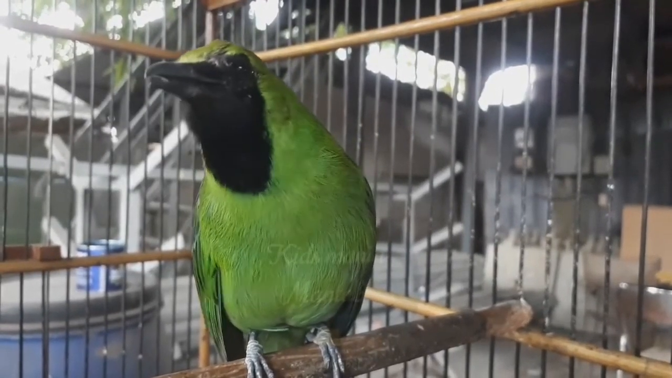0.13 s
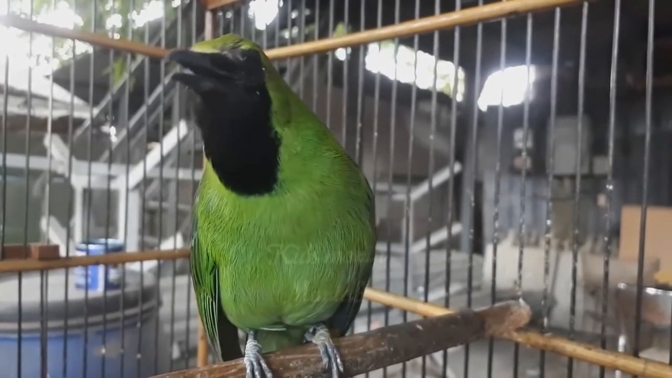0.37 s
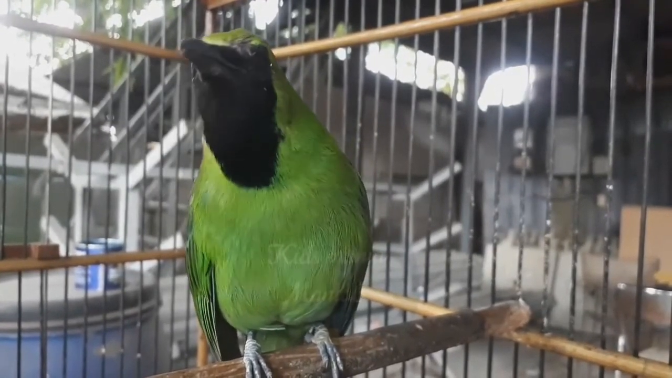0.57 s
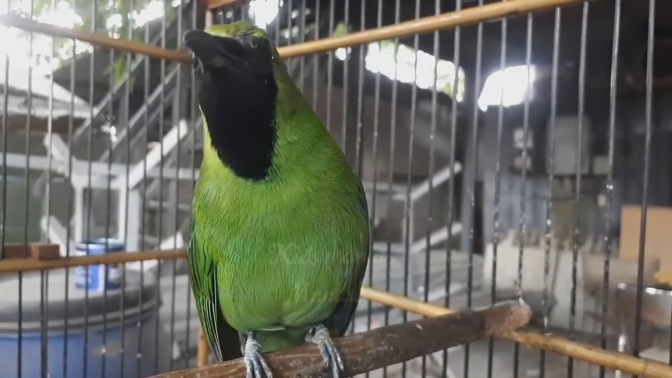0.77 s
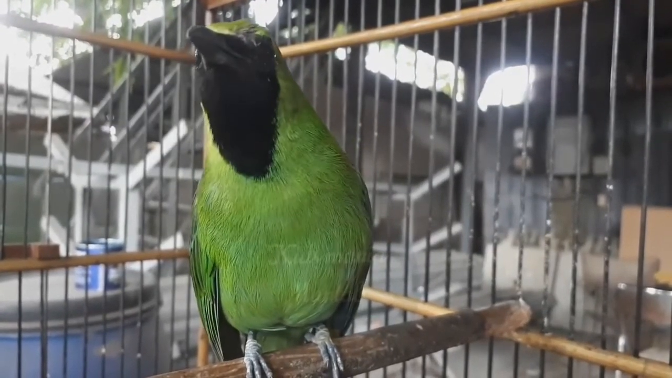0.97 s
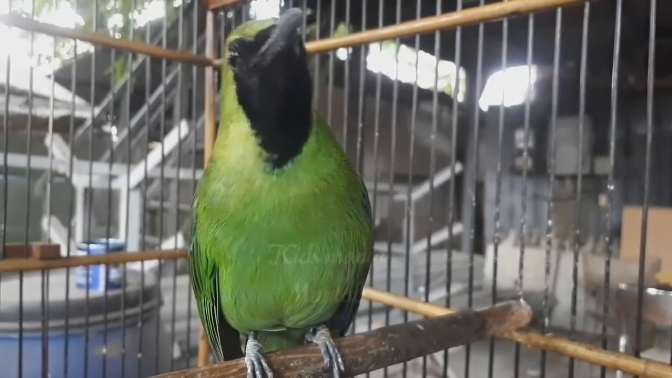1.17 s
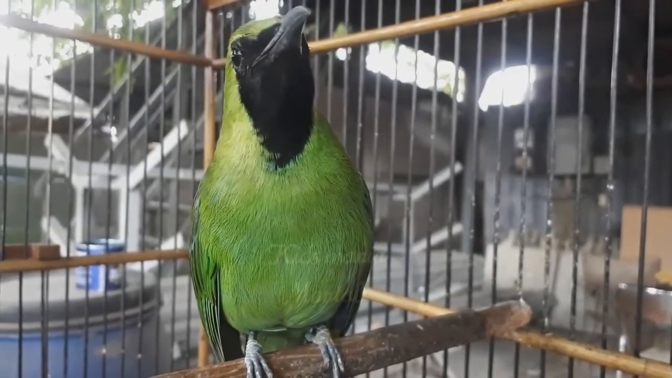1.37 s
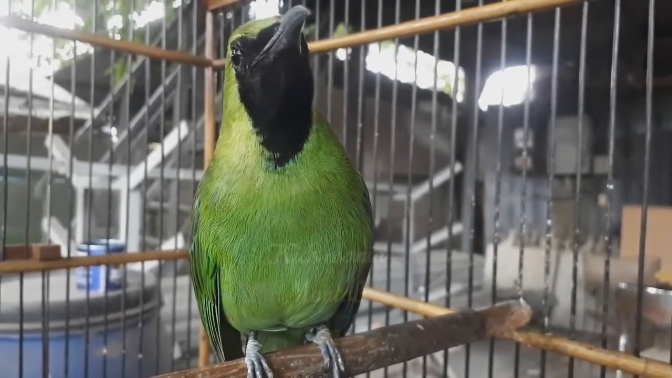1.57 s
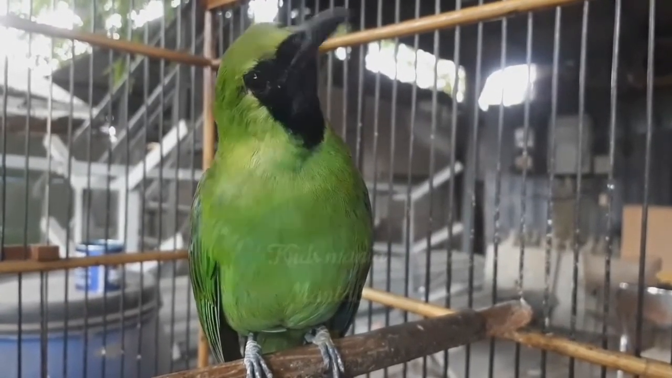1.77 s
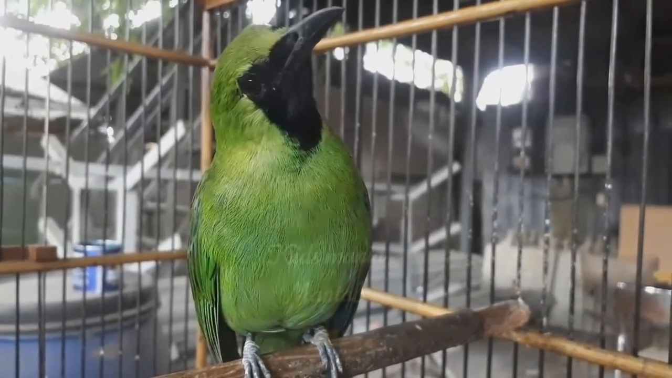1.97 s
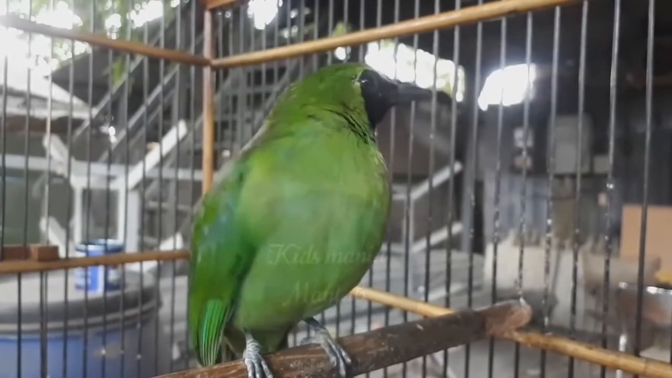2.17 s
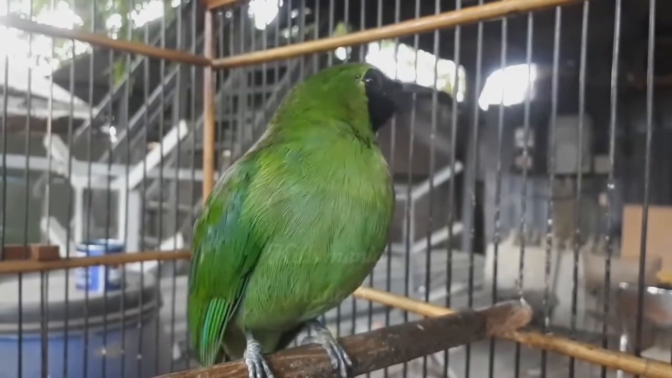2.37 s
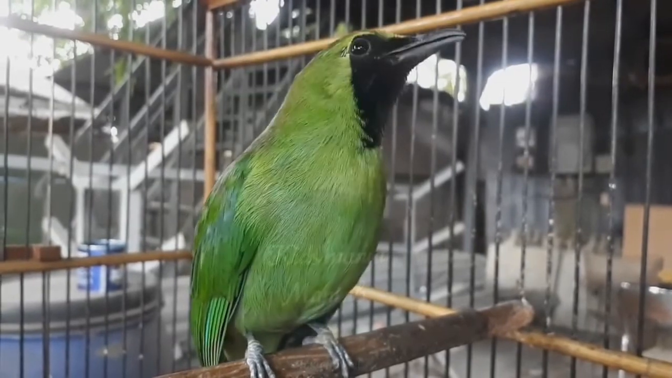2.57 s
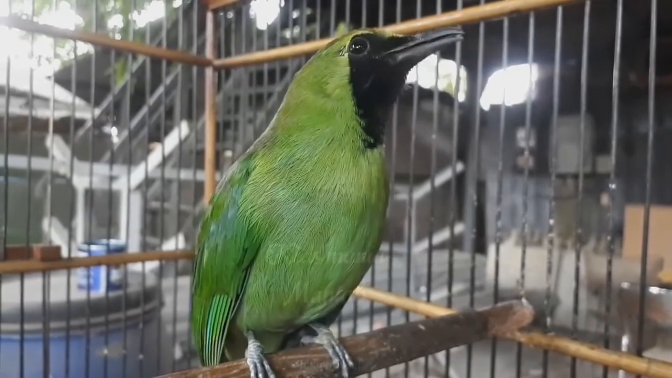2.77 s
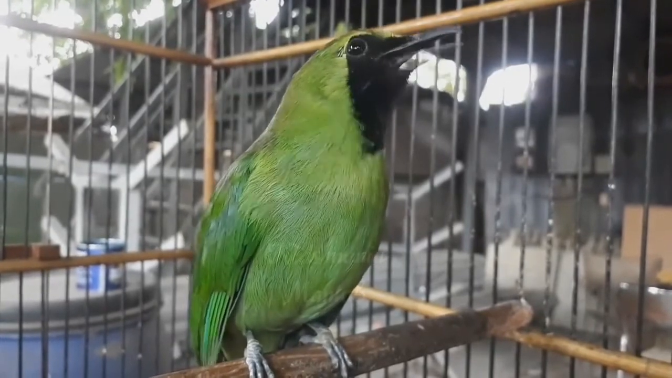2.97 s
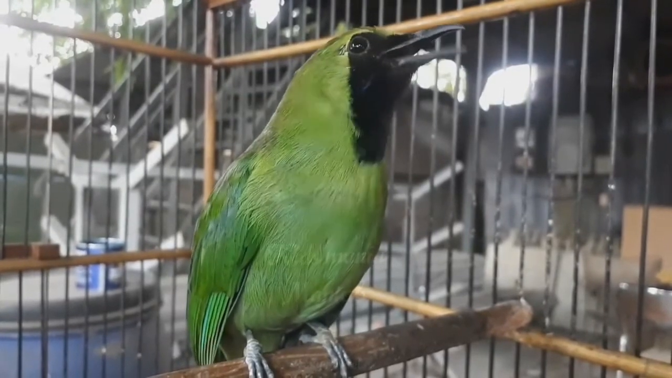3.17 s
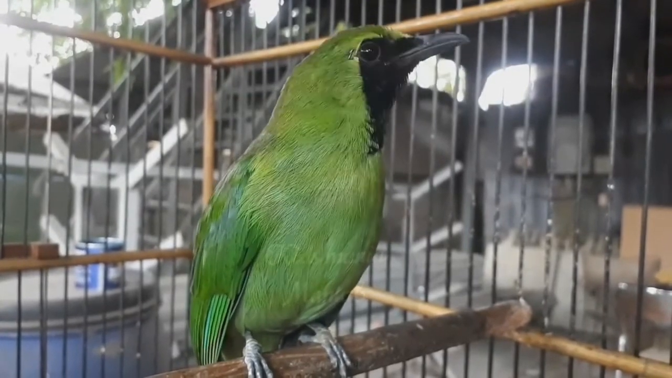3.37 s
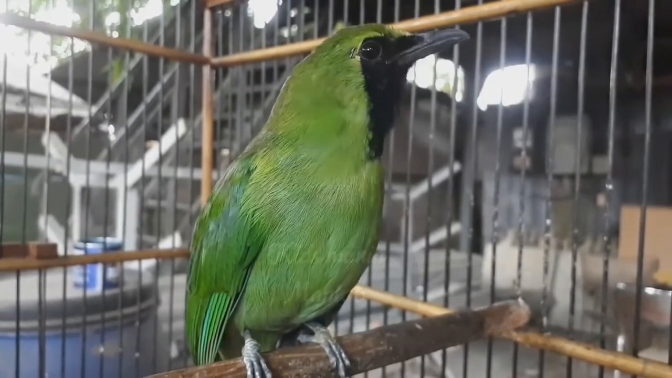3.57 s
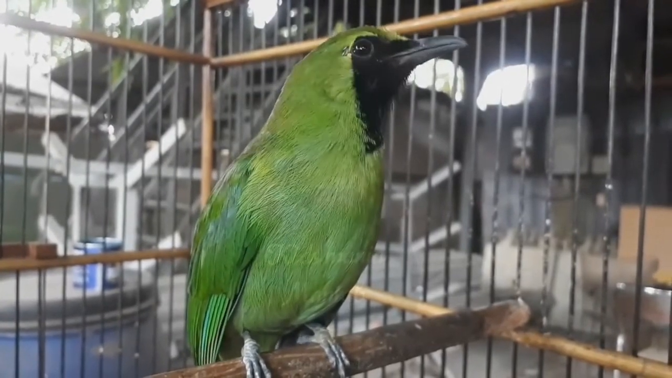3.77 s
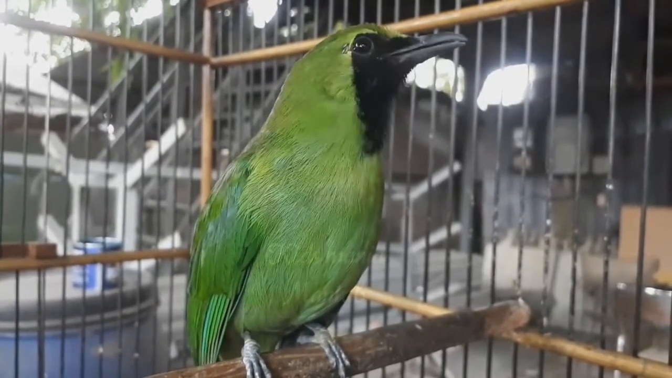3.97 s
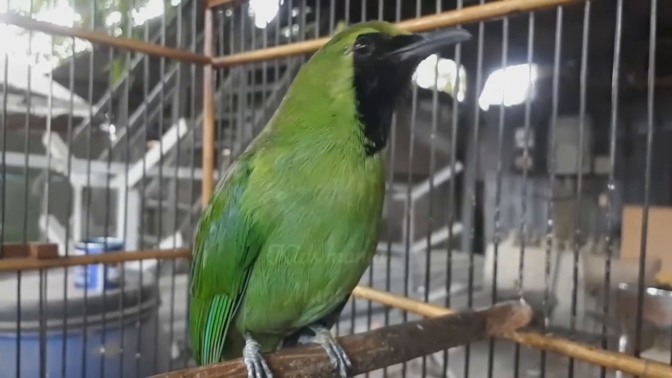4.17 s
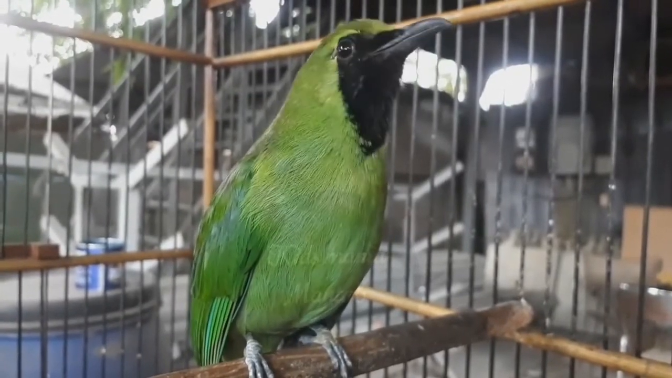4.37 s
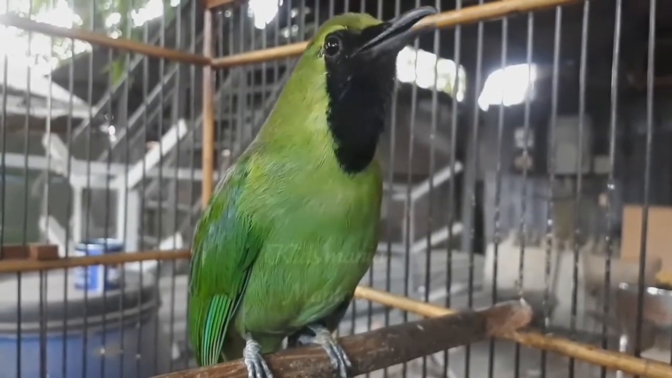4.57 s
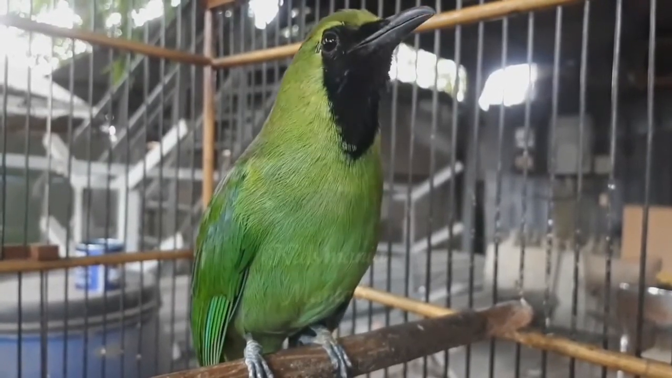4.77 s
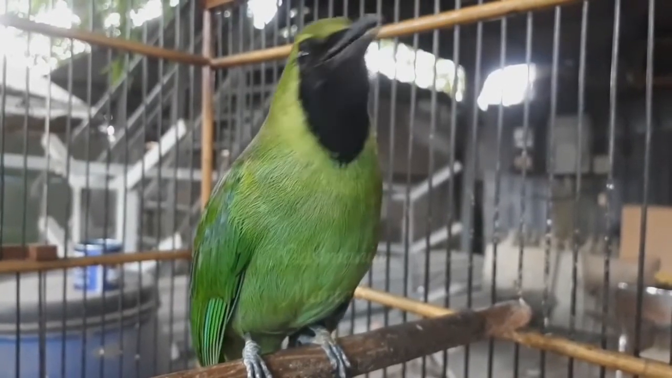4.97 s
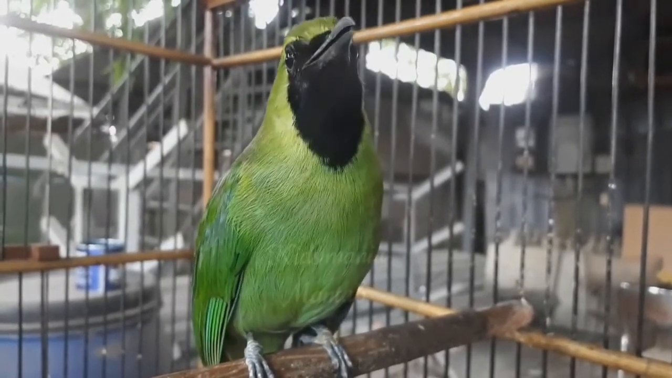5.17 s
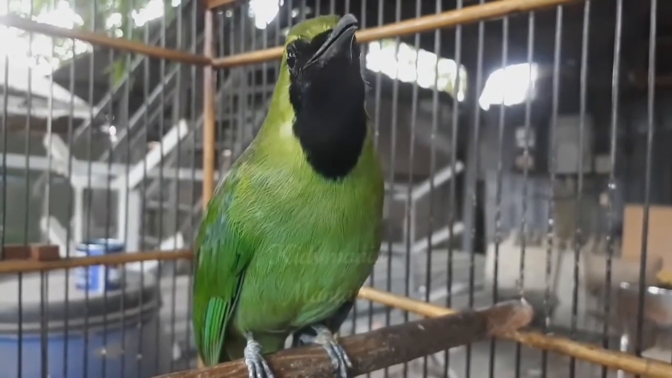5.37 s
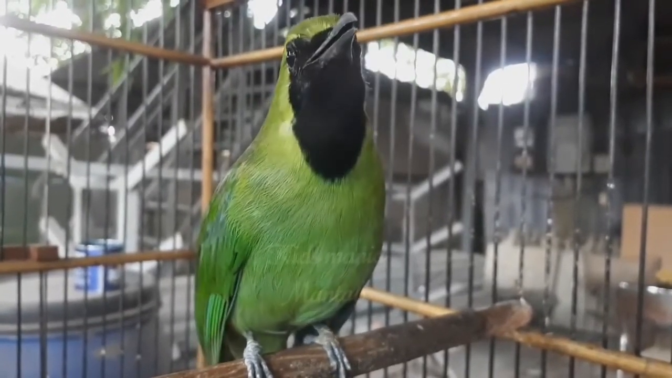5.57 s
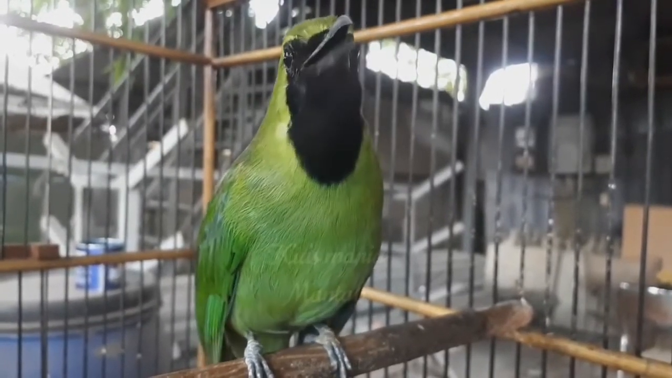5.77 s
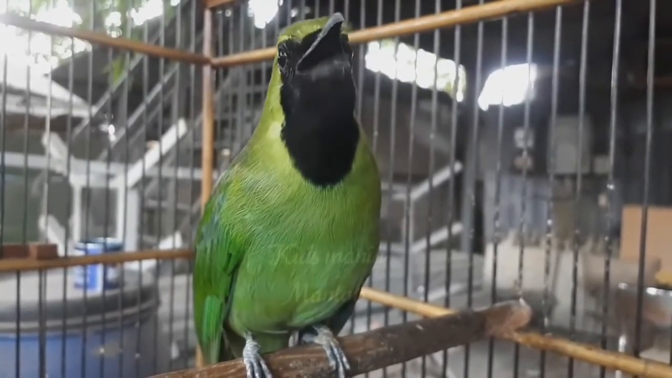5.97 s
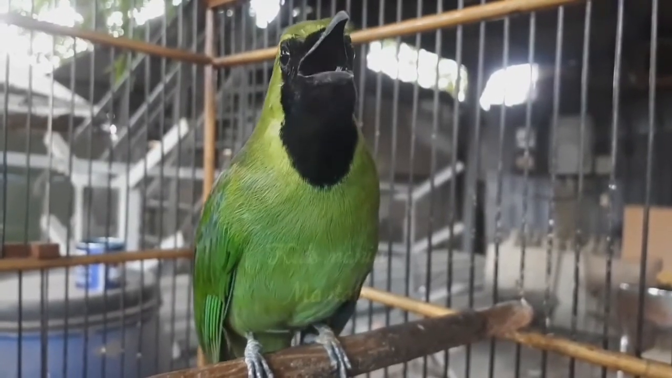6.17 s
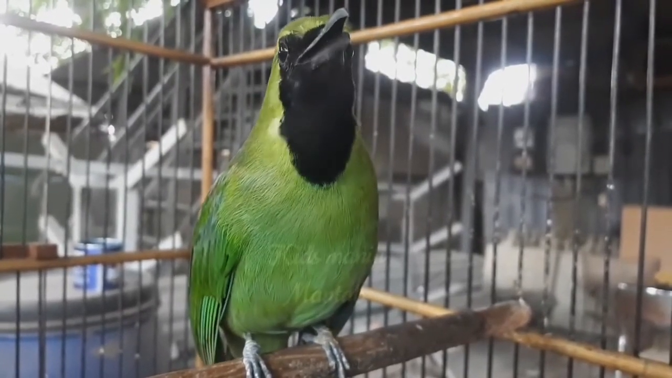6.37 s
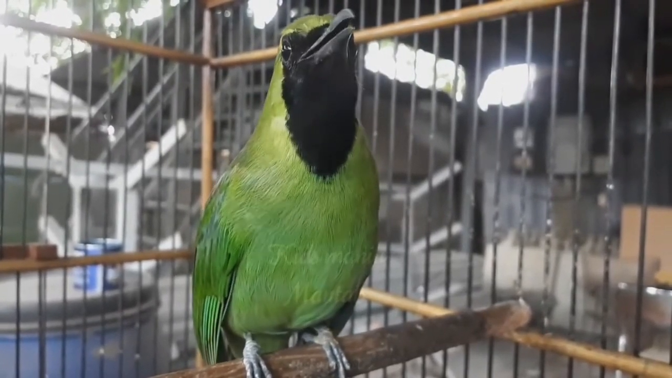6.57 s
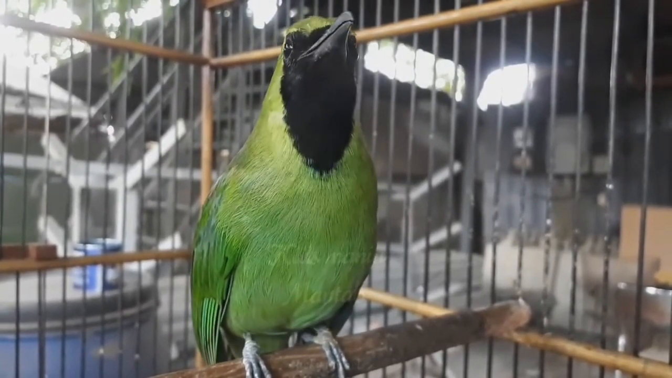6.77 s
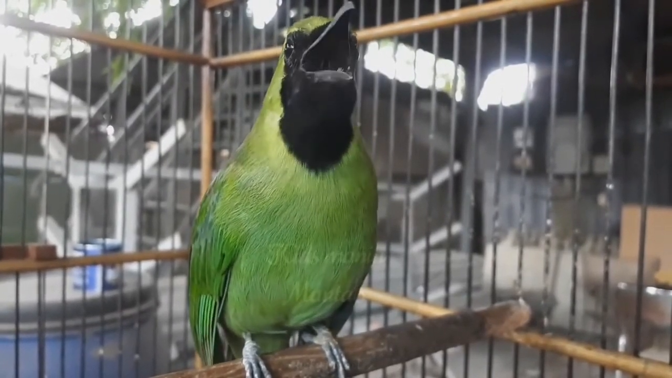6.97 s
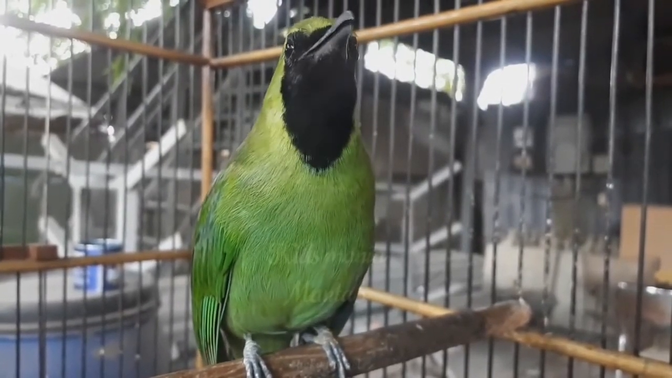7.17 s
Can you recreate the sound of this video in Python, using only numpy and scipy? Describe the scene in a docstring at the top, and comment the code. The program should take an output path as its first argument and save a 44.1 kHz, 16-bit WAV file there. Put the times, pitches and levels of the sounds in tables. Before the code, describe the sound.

A caged leafbird close by gives soft raspy chatter, loud piercing whistles, a buzz, a quick trill and rising slurs in an echoing room.

```python
"""Leafbird song in a live room

A leafbird sings near two microphones: soft chatter, loud whistles, a buzz, a fast trill and rising slurs.
The two sides of its syrinx (voice organ) glide alone or together as near-sine tones with weak overtones
coloured by the throat; harsh notes add filtered noise. Bursts of noise make beak ticks and feather rustle.
Fading noise makes the room's echo, over room noise, a low wavering hum and a dull noise further off.
"""
import sys
import numpy as np
from scipy import signal
from scipy.fft import rfft, irfft, next_fast_len
from scipy.io import wavfile
from scipy.ndimage import uniform_filter1d, minimum_filter1d, map_coordinates

SR = 44100
rng = np.random.default_rng(int(sys.argv[2]) if len(sys.argv) > 2 else 0)


def transcribe(signal):
    """Save signal, clipped to [-1, 1], as a 16-bit WAV file at the path in sys.argv[1]."""
    frames = np.atleast_2d(signal).T
    limited = np.clip(frames, -1, 1)
    pcm = np.round(limited * 32767).astype(np.int16)
    wavfile.write(sys.argv[1], SR, pcm)


N = 318843  # samples in the scene
T = np.arange(N) / SR  # time [s]


def undb(db):
    """Turn decibels into gain."""
    return 10 ** (np.asarray(db) / 20)


def unit(x):
    """Scale to an rms of 1."""
    return x / np.sqrt(np.mean(x ** 2))


def curves(rows):
    """Join the points of each table column by straight lines in time."""
    times, *columns = np.transpose(rows)
    return [np.interp(T, times, column) for column in columns]


def response(hz, points):
    """Gain at the given frequencies, read from a (frequency [Hz], level [dB]) table."""
    table_hz, table_db = np.transpose(points)
    return undb(np.interp(np.log(hz + 1), np.log(table_hz), table_db))


def colour(x, gain):
    """Filter a sound by a gain that depends on frequency."""
    size = x.shape[-1]
    padded = next_fast_len(size, True)
    spectrum = rfft(x, padded) * gain(np.fft.rfftfreq(padded, 1 / SR))
    return irfft(spectrum, padded)[..., :size]


def band(shape, hz, width_hz):
    """Noise in one bell-shaped band, with an rms of 1."""
    noise = rng.standard_normal(shape)
    return unit(colour(noise, lambda f: np.exp(-2 * ((f - hz) / width_hz) ** 2)))


def spread(pair, side):
    """Widen to stereo: the first noise is shared, the second has opposite sign in each ear."""
    return pair[0] + side * np.array([[1], [-1]]) * pair[1]


def song():
    """All notes added up, each sung in its own stretch of time."""
    out = np.zeros(N)
    rasp, warble = harshness()
    for strokes, overtone_db in whistles() + rasps() + trill() + rises():
        times = [row[0] for rows in strokes for row in rows]
        span = (T > min(times) - .01) & (T < max(times) + .01)
        out[span] += phrase(T[span], strokes, overtone_db, rasp[span], warble[span])
    return out


# clear whistles, one smooth glide each: (start [s], length [s], evenly spaced pitches [Hz], level [dB],
# place of the crest [0-1], steepness of the swell [power], overtones [dB])
WHISTLE_NOTES = [ (0.362, 0.094, (2130, 1896, 1622, 1530), -11.5, 0.31, 1.2, -7.5),
                 (0.456, 0.07, (1870, 2158, 2282, 2307), -9, 1, 0.83, 0),
                 (0.637, 0.18, (1687, 1820, 1619, 1340, 1175), -16.5, 0.15, 1.1, -2),
                 (2.532, 0.084, (5620, 5240, 5078, 4892, 4826, 3900), 0, 0.66, 1, 8),
                 (2.767, 0.083, (4750, 5067, 5000, 4830, 4994), 0.5, 1, 0.81, 12),
                 (3.003, 0.11, (4840, 5186, 5214, 4750, 4563, 3700), 0.5, 0.5, 1.03, 8),
                 (3.284, 0.11, (4680, 2670, 2299, 2093, 1760), -4, 0.23, 3.3, -1.5),
                 (4.131, 0.072, (2200, 2060, 2200), -25, 0.73, .7, -13),
                 (4.156, 0.086, (1964, 2018, 2031, 1900), -7, 0.73, 1.77, -5.5),
                 (4.653, 0.11, (2430, 2125, 1940, 1958), -4.5, .65, 0.62, -4.5),
                 (5.392, 0.054, (3195, 2455, 2186, 1860), -5.5, 0.44, 0.27, 0.5),
                 (5.512, 0.047, (2180, 2090, 1968, 1580), -7.5, 0.62, 1.2, -0.5),
                 (5.613, 0.043, (1903, 2044, 1950, 1615), -3.5, 0.76, 2.16, -4.5),
                 (5.733, 0.037, (1610, 1876, 1660, 1640), -7, 0.72, 0.5, 0),
                 (6.456, 0.051, (1896, 2442, 2533, 3130), -5, 0.51, 0.96, -7.5),
                 (6.492, 0.12, (1620, 1735, 1885, 1880, 1333), -9.5, 0.68, 1.52, 1),
                 (6.599, 0.055, (2990, 2746, 2403, 2290), -8, 0.7, 0.84, 3), ]


def whistles():
    """Each whistle is one pure stroke of the syrinx with a bending pitch."""
    return [([glide(*shape)], overtone_db) for *shape, overtone_db in WHISTLE_NOTES]


# harsh notes and quick scoops of the chatter and the buzzes, one straight glide each:
# (start [s], length [s], from pitch [Hz], to pitch [Hz], level [dB], overtones [dB])
RASP_NOTES = [ (0.01, 0.014, 2200, 3500, -19.5, -5), (0.027, .015, 2880, 3680, -13, -1.5),
              (0.091, 0.04, 2350, 2705, -12.5, -2), (0.202, 0.0089, 980, 2280, -31.5, -11),
              (0.209, 0.038, 2450, 2587, -11, -8), (0.228, 0.042, 2130, 2568, -12, -1),
              (0.355, 0.0091, 890, 1930, -38.5, 10), (0.627, 0.013, 1070, 1760, -44.5, -16),
              (3.765, 0.056, 1510, 1102, -30.5, -3), (5.149, 0.018, 2643, 3976, -11.5, 2),
              (5.158, 0.027, 2360, 2810, -15, 8), (5.185, 0.073, 3025, 3278, -4, 1.5), ]


def rasps():
    """Each rasp or scoop is a straight glide that is loudest near its end."""
    return [([glide(start, length, pitches, db, crest=1.0)], overtone_db)
            for start, length, *pitches, db, overtone_db in RASP_NOTES]


# trill syllables: (start [s], upstroke length [s], upstroke pitch [Hz], arch length [s], arch pitch [Hz],
# arch level [dB], downstroke delay [s], downstroke length [s], downstroke pitch [Hz], downstroke level [dB])
TRILL_SYLLABLES = [ (5.822, .022, 2547, 0.031, 1708, -15.5, 0.027, 0.021, 2154, -9.5),
                   (5.922, 0.024, 2570, 0.042, 1720, -17.5, 0.026, 0.017, 2430, -2.5),
                   (6.018, .012, 2620, 0.022, 2403, -9, 0.03, .027, 2605, -6.5),
                   (6.118, 0.019, 2870, .022, 2294, -17.5, 0.027, .028, 2800, -0.5),
                   (6.231, .01, 2940, 0.03, 3040, -1, 0.041, 0.018, 3024, -8.5),
                   (6.33, 0.0086, 2920, 0.023, 3010, 3.5, 0.032, 0.019, 2867, -3), ]


def trill():
    """A run of syllables, each an upstroke, an arch and a downstroke."""
    return [(syllable(*row), 0) for row in TRILL_SYLLABLES]


# pitch through each stroke, as a multiple of its listed pitch
UPSTROKE, ARCH, DOWNSTROKE = (0.87, 1, 1.3), (.65, 1, 0.728), (1.4, 0.99, 0.97)
UPSTROKE_DB, ARCH_DELAY_S = -10, .009


def syllable(start, up_s, up_hz, arch_s, arch_hz, arch_db, down_delay_s, down_s, down_hz, down_db):
    """Upstroke and downstroke of one trill syllable, with an arch from the other side of the syrinx."""
    up = glide(start, up_s, up_hz * np.array(UPSTROKE), UPSTROKE_DB, crest=0.59)
    arch = glide(start + ARCH_DELAY_S, arch_s, arch_hz * np.array(ARCH), arch_db, swell=1.3)
    down = glide(start + down_delay_s, down_s, down_hz * np.array(DOWNSTROKE), down_db)
    return [up, arch, down]


# first and shorter rising slur, before its gain: (time [s], pitch [Hz], level [dB])
SHORT_SLUR = [(3.7, 1680, -42), (3.712, 1700, -26), (3.73, 1420, -20), (3.742, 2100, -11),
              (3.758, 2470, -5.5), (3.784, 3070, -12.5), (3.812, 3410, -11), (3.832, 3250, -20)]
# second and longer rising slur, before its gain: (time [s], pitch [Hz], level [dB])
LONG_SLUR = [(7.02, 2150, -39), (7.044, 2410, -17), (7.058, 2673, -8.5), (7.086, 3420, -16),
             (7.114, 4000, -12), (7.136, 4490, -23), (7.166, 4390, -13), (7.202, 4610, -12.5),
             (7.229, 4646, -18)]


def rises():
    """Two slurs climb in pitch along drawn paths while their level rises and falls."""
    slurs = [(SHORT_SLUR, -2, 0.5), (LONG_SLUR, 4.5, 0)]  # (path, gain [dB], overtones [dB])
    return [([np.array(rows) + [0, 0, gain_db]], overtone_db) for rows, gain_db, overtone_db in slurs]


FADE_POWER = 0.94  # low values hold a note up until its end


def glide(start, length, pitches, db, crest=0.44, swell=0.48):
    """One stroke as (time, pitch, level) rows: the pitch bends smoothly as the level swells and fades."""
    u = np.linspace(0, 1, 65)  # progress through the stroke
    bend = np.polyfit(np.linspace(0, 1, len(pitches)), pitches, len(pitches) - 1)
    hz = np.polyval(bend, u)
    crest = np.clip(crest, .05, .95)
    arc = np.sin(np.interp(u, [0, crest, 1], [0, np.pi / 2, np.pi])) + 1e-4  # never quite zero
    power = np.where(u < crest, swell, FADE_POWER)
    return np.transpose([start + length * u, hz, db + 20 * np.log10(arc) * power])


# where the voice turns harsh: (from time [s], to time [s], rasp [0-1], typical warble depth [share of pitch])
HARSH_STRETCHES = [ (0, .27, .33, .045), (2.598, 2.615, .06, 0), (2.825, 2.85, .08, 0),
                   (3.07, 3.11, .05, 0), (3.764, 3.835, .5, .07), (5.15, 5.27, .33, .09),
                   (5.74, 6.39, .25, .04), (7.07, 7.135, .26, .04), ]


def harshness(edge_s=0.0072):
    """Rasp and warble depth over time; both are zero outside the harsh stretches."""
    controls = sum(np.outer([rasp, warble], (T > start) & (T < end))
                   for start, end, rasp, warble in HARSH_STRETCHES)
    return uniform_filter1d(controls, int(edge_s * SR))  # soft edges


THROB = 3.5  # level swing per unit of pitch swing in a warble


def stroke(t, rows, warble, warble_hz=108):
    """One side of the syrinx: a glide that can warble unevenly, with its level throbbing as it does."""
    times, hz, db = np.transpose(rows)
    size = int(.003 * SR)  # smoothing over 3 ms
    loud = uniform_filter1d(np.interp(t, times, undb(db), left=0, right=0), size)
    pitch = uniform_filter1d(np.interp(t, times, hz), size)
    pace, depth = band((2, len(t)), 0, 2 * warble_hz)
    flutter = np.cumsum(warble_hz * (1 + .5 * pace)) / SR
    swing = warble * (1 + .5 * depth) * np.sin(2 * np.pi * flutter)
    return loud * np.maximum(1 - THROB * swing, 0), pitch * (1 + swing)


# throat colour for overtones and hiss, before each note's own overtone level: (frequency [Hz], level [dB])
THROAT_COLOUR = [(1000, -39), (2500, -26.5), (4200, -31), (6200, -31), (8000, -35), (9200, -31.5),
                 (10400, -36.5), (11500, -39), (13200, -32), (15000, -40)]
BREATHY, PURE_JITTER = .08, .06  # air hiss under a pure note [share], its phase jitter [radians]


def phrase(t, strokes, overtone_db, rasp, warble, fall_db=-1.0, hiss_db=-13,
           grit_db=-1, grit_hz=3000, beat_db=-39, beat_hz=3950):
    """Near-sine strokes with weak, unsteady overtones; harsh ones add grit and throat-coloured hiss."""
    tone, grit, airflow = np.zeros((3, len(t)))
    for rows in strokes:
        loud, pitch = stroke(t, rows, warble)
        phase = 2 * np.pi * np.cumsum(pitch) / SR
        wave = np.sin(phase)
        # irregular vibration spreads noise around the pitch and around an undertone
        shake = band((3, len(t)), 0, 900)
        around_pitch = shake[0] * np.cos(phase) + shake[1] * np.sin(phase)
        around_undertone = shake[2] * np.sin(.72 * phase)
        grit += loud * rasp * (around_pitch + around_undertone)
        # above 4700 Hz a faint second vibration beats against the first
        wave = wave + undb(beat_db) * (pitch > 4700) * wave * np.sin(2 * np.pi * beat_hz * t)
        jittered = phase + (rasp * .6 + PURE_JITTER) * shake[0]
        for k in range(2, 9):  # overtones at k times the pitch
            uneven_db = 3 * band(len(t), 0, 80)
            level_db = overtone_db + fall_db * (k - 2.0) + uneven_db
            gain = response(k * pitch, THROAT_COLOUR) * undb(level_db)
            wave += gain * (k * pitch < SR / 2) * np.sin(k * jittered)
        # rasp takes power away from the clear tone
        tone += np.sqrt(2) * loud * np.sqrt(1 - rasp ** 2) * wave
        airflow += loud
    grit = colour(grit, lambda f: np.exp(-(np.log((f + 1) / grit_hz) / .6) ** 2))
    hiss = unit(colour(rng.standard_normal(len(t)), lambda f: response(f, THROAT_COLOUR)))
    breath = airflow * (rasp * undb(overtone_db) + BREATHY) * undb(hiss_db) * hiss / 2
    return tone + undb(grit_db) * grit + breath


# beak ticks outside the trill: (time [s], level at the onset [dB])
BEAK_TICKS = [(1.193, -36.5), (1.33, -42.5), (3.263, -37), (4.118, -35.5), (4.599, -32), (5.139, -26.5),
              (5.367, -32.5), (5.608, -27), (5.719, -28)]
# colour of a tick: (frequency [Hz], level [dB])
BEAK_COLOUR = [(250, -26), (600, -7), (1200, -10), (2000, 0), (3200, -9), (5000, -26), (14000, -50)]
TICK_LEAD_S, TRILL_TICK_DB = .008, -29  # one tick ahead of each trill syllable


def beak():
    """Short dry ticks: coloured noise that dies away within milliseconds."""
    out = np.zeros(N)
    t = T[:2048]
    decay_s = .003
    trill_ticks = [(row[0] - TICK_LEAD_S, TRILL_TICK_DB) for row in TRILL_SYLLABLES]
    for time, db in BEAK_TICKS + trill_ticks:
        ring = unit(colour(rng.standard_normal(len(t)), lambda f: response(f, BEAK_COLOUR)))
        start = int(time * SR)
        out[start:start + len(t)] += undb(db) * ring * np.exp(-t / decay_s)
    return out


# the bird shuffles round on its perch: (time [s], soft wing air level [dB], feather hiss level [dB])
PERCH_SHUFFLE = [(1.87, -97, -112), (1.89, -56, -54.5), (2.05, -81.5, -60), (2.07, -55, -45.5),
                 (2.37, -50.5, -57), (2.44, -43.5, -47), (2.53, -51.5, -53), (2.7, -85, -85)]


def feathers():
    """Wings push air softly while feather vanes scrape in a lightly flickering hiss."""
    air_db, hiss_db = curves(PERCH_SHUFFLE)
    air = band(N, 700, 1300)
    scrape = band(N, 3500, 2600) + 0.26 * band(N, 5600, 7000)
    flicker_db = 1.5 * band(N, 0, 330)
    return undb(air_db) * air + undb(hiss_db + flicker_db) * scrape


def room(x, late_db=-22, early_db=-16, wall_db=-22, absorb_hz=7000):
    """Near surfaces answer first; a diffuse tail of fading noise rings on, and its treble dies first."""
    t = T[:SR]
    low_t60, high_t60 = .64, .42  # time to fade by 60 dB [s]
    early_s, gap_s = .016, .003  # fade of the early echoes, wait before the first echo
    noise = rng.standard_normal((3, 2, SR))
    low = colour(noise[0], lambda f: 1 / np.sqrt(1 + (f / 3200) ** 8)) * undb(-60 * t / low_t60)
    high = colour(noise[1], lambda f: 1 / np.sqrt(1 + (3200 / (f + 1)) ** 8)) * undb(-60 * t / high_t60)
    tail = (low + high) / np.sqrt(SR * low_t60 / np.log(1e6))
    early = noise[2] * np.exp(-t / early_s) / np.sqrt(SR * early_s / 2)
    echo = undb(late_db) * tail + undb(early_db) * early
    echo = np.pad(echo, ((0, 0), (int(gap_s * SR), 0)))
    # the nearest wall throws back one distinct echo after 20 ms
    echo[:, int(.02 * SR)] += undb(wall_db)
    echo = colour(echo, lambda f: 1 / np.sqrt(1 + (f / absorb_hz) ** 2))
    return signal.fftconvolve(x[None], echo, axes=1)[:, :N]


# colour of the room noise: (frequency [Hz], level [dB])
ROOM_NOISE_COLOUR = [(25, -44.5), (42, -6.5), (144, -2), (424, -13.5), (598, -15.5), (844, -22),
                     (1720, -22), (1950, -18.5), (2550, -25.5), (3880, -26.5), (15000, -46.5)]
# a dull distant noise comes and goes: (time [s], level [dB])
DISTANT_NOISE = [(0, -58.5), (1.8, -68.5), (2.9, -52), (3.3, -74), (4.15, -80.5), (4.28, -50), (4.6, -67),
                 (5.6, -60), (6.6, -54.5), (7.2, -54.5)]


def background(floor_db=-54, hum_db=-57, hum_hz=138, dip_share=0.31):
    """Room noise and a wavering low hum, quieter for a while in the middle, with a dull noise further off."""
    distant_db = curves(DISTANT_NOISE)[0]
    noise = unit(colour(rng.standard_normal((2, N)), lambda f: response(f, ROOM_NOISE_COLOUR)))
    noise[1] = colour(noise[1], lambda f: np.clip(f / 800, .18, 1))  # the bass is more alike on both sides
    sway_db = .8 * band(N, 0, 3)  # slow drift of the level
    floor = undb(floor_db + sway_db) * spread(noise, 1.0)
    hum = undb(hum_db) * spread(band((2, N), hum_hz, 22), .2)
    hum = hum + undb(-69.5) * spread(band((2, N), 581, 40), .6)  # a faint higher tone in the hum
    dull = band((2, N), 680, 860) + undb(-10.5) * band((2, N), 770, 70)
    distant = undb(distant_db) * spread(dull, .6)
    # the level of room noise and hum is shaped by a share of the same curve
    level_change_db = dip_share * (distant_db - distant_db.mean())
    return (floor + hum) * undb(level_change_db) + distant


# where the beak points: (time [s], right ear lag [ms], left minus right level [dB])
HEAD_TURNS = [(.8, 0.2, 6.5), (2.55, 0.073, -6.5), (3.4, 0.068, -3), (4.2, 0.071, -4.5), (4.7, 0.099, -1.5),
              (5.5, 0.12, 1), (7.1, 0.12, -1)]


def scene():
    """The bird reaches the two microphones with a lag and balance that follow its head."""
    bird = song() + beak() + feathers()
    lag_ms, pan_db = curves(HEAD_TURNS)
    right = map_coordinates(bird, [np.arange(N) - lag_ms * SR / 1000], order=3)
    sides = undb(np.array([pan_db, -pan_db]) / 2)
    sides = sides / np.sqrt(np.mean(sides ** 2, axis=0))  # same total power wherever the beak points
    direct = np.array([bird, right]) * sides
    return direct + room(bird) + background()


TOP_HZ = 15900  # the recorder passes nothing much above this


def record(dry):
    """A fast limiter turns down the loudest peaks; then a steep filter cuts the top."""
    ceiling, size = .88, int(.003 * SR)
    gain = ceiling / np.maximum(np.abs(dry).max(axis=0), ceiling)
    gain = uniform_filter1d(minimum_filter1d(gain, 2 * size), size)
    top_cut = signal.ellip(10, .1, 80, TOP_HZ, fs=SR, output="sos")
    return signal.sosfilt(top_cut, dry * gain)


dry = scene()
out = record(dry)
transcribe(out)
```